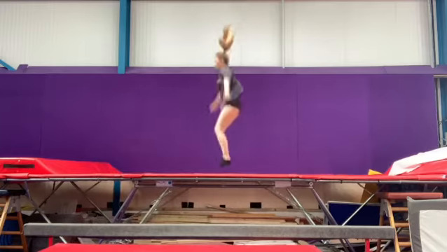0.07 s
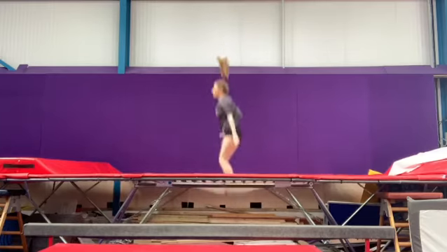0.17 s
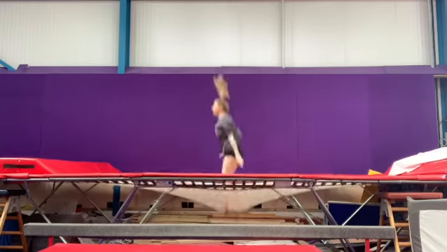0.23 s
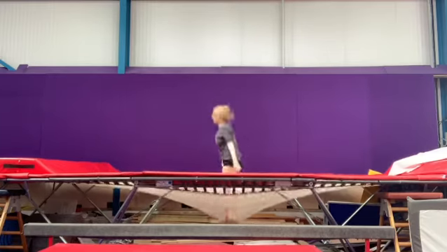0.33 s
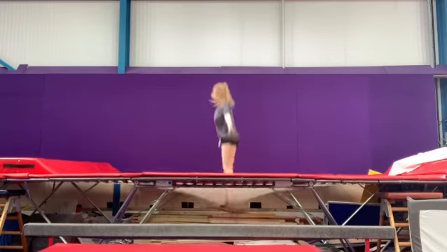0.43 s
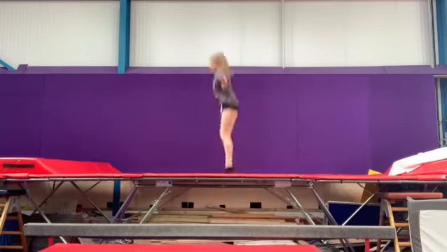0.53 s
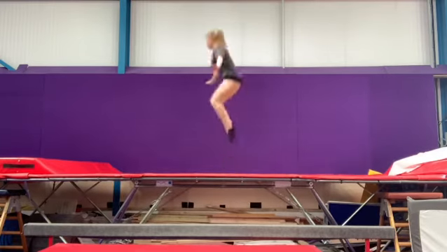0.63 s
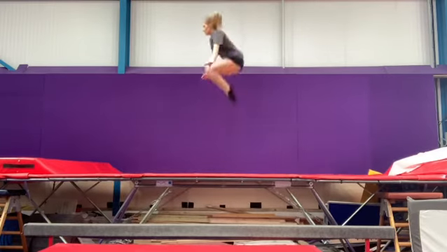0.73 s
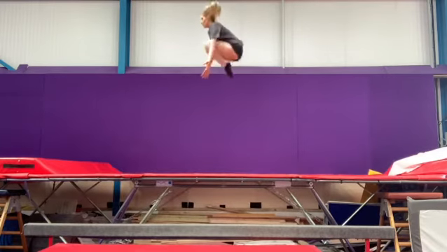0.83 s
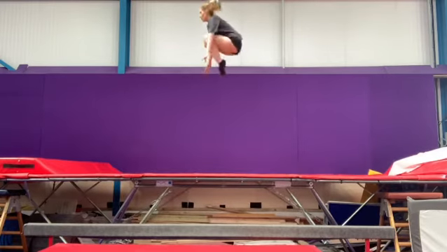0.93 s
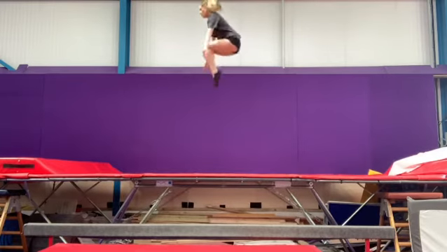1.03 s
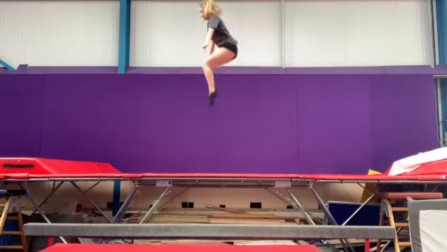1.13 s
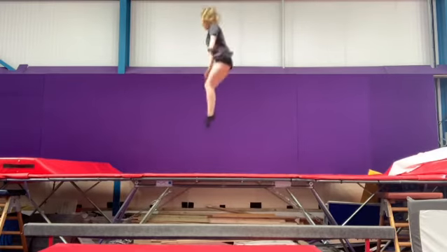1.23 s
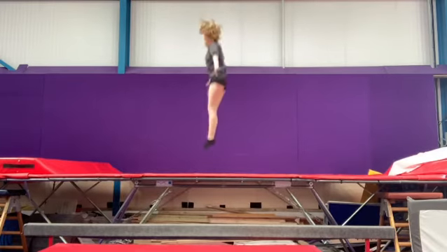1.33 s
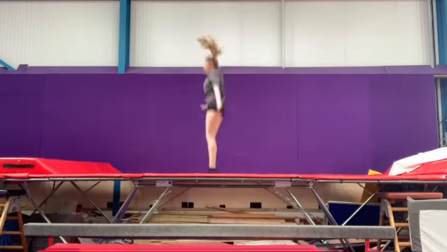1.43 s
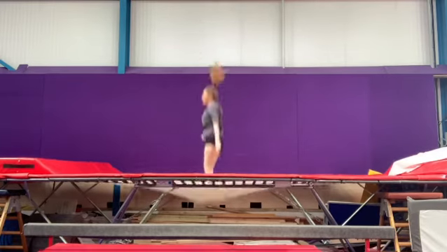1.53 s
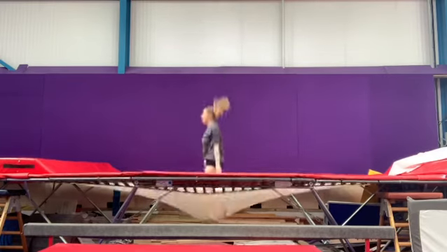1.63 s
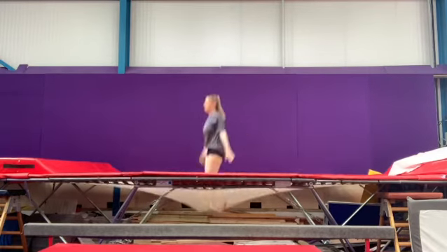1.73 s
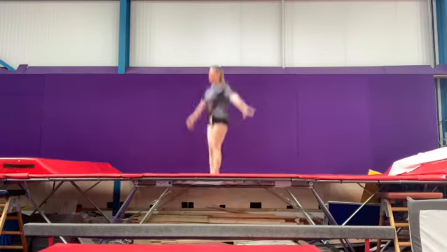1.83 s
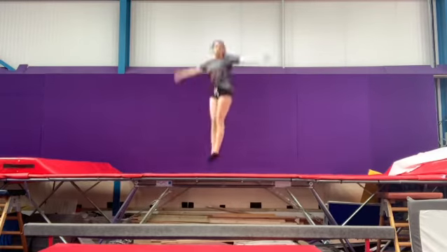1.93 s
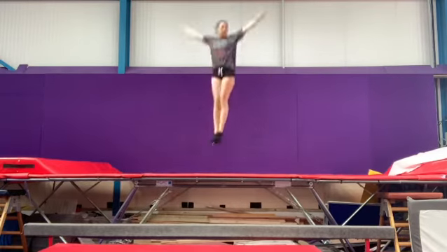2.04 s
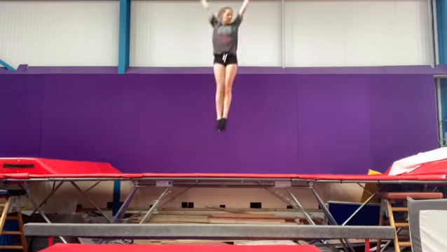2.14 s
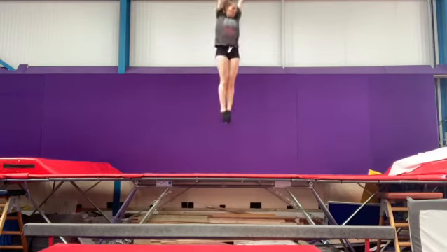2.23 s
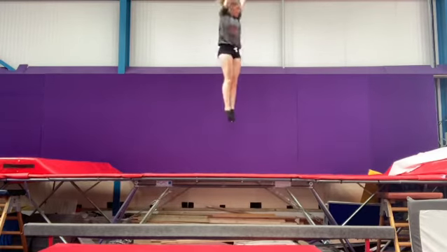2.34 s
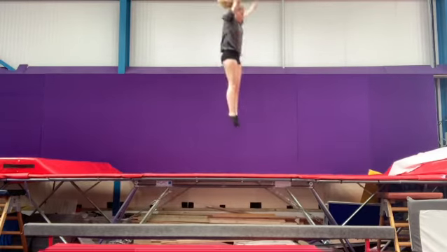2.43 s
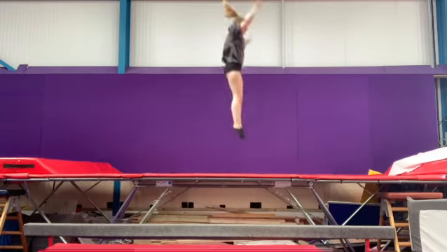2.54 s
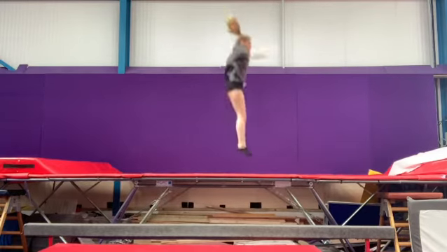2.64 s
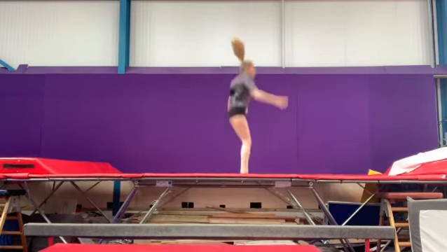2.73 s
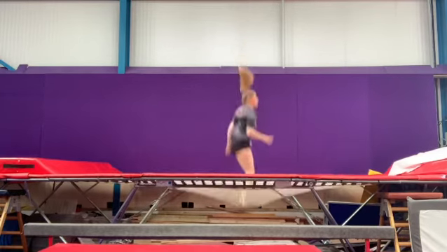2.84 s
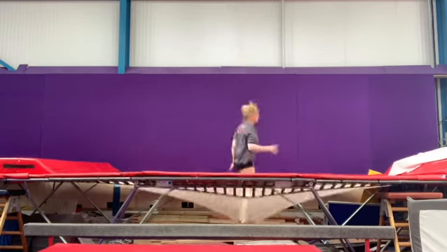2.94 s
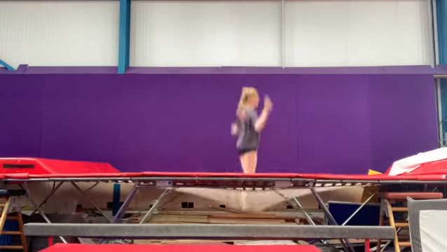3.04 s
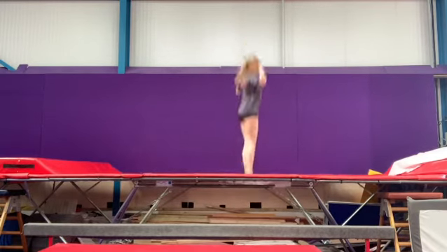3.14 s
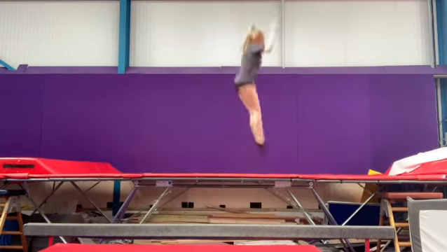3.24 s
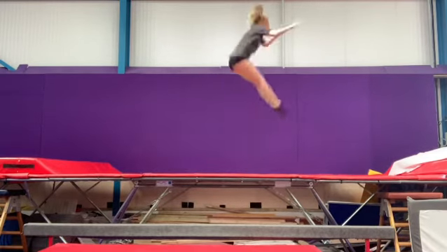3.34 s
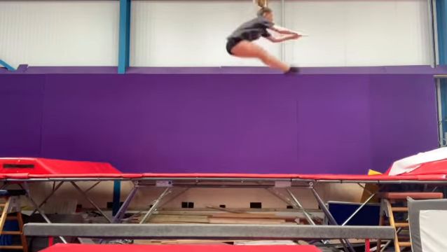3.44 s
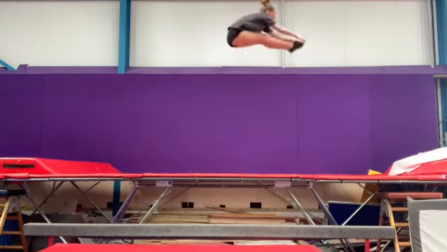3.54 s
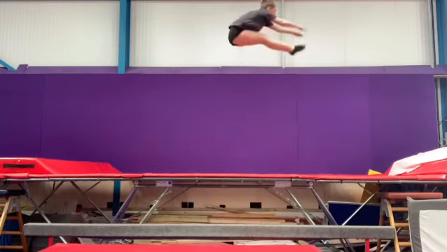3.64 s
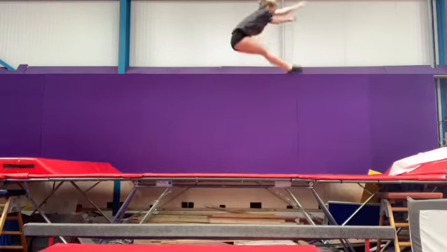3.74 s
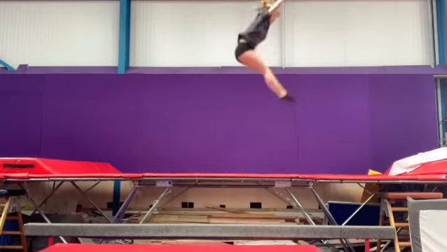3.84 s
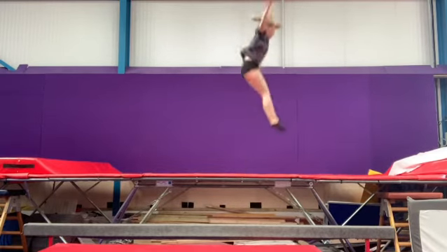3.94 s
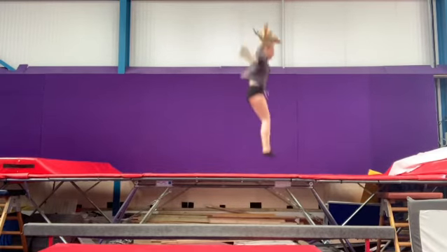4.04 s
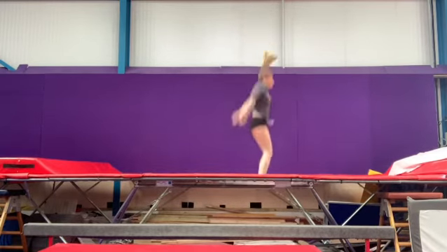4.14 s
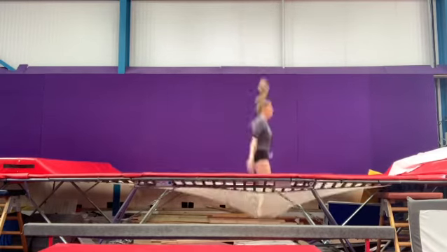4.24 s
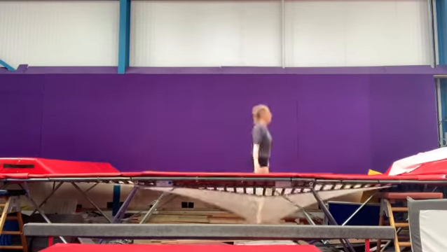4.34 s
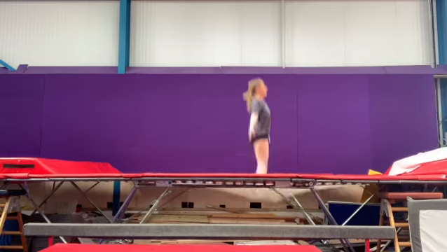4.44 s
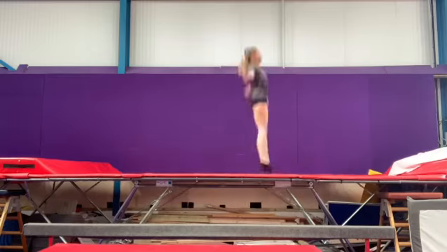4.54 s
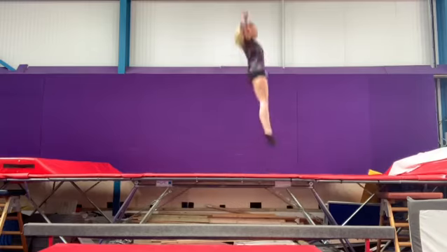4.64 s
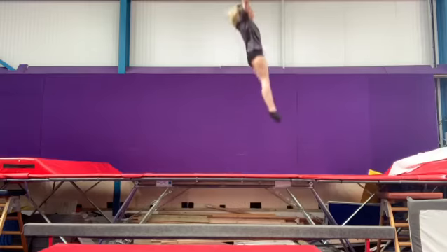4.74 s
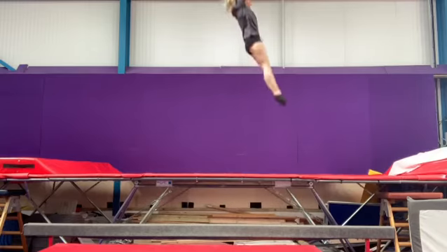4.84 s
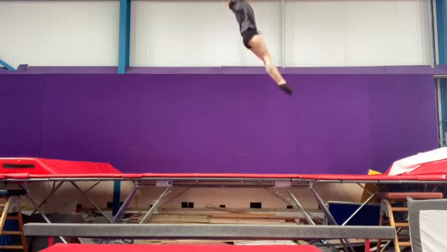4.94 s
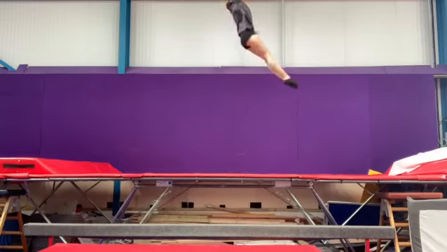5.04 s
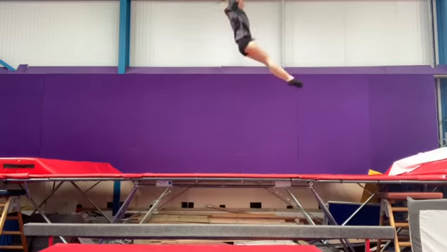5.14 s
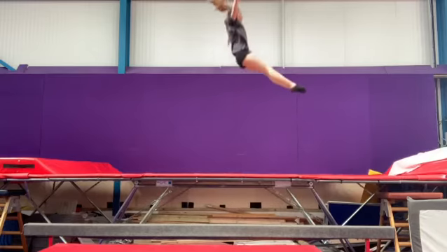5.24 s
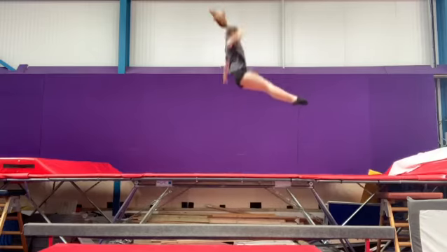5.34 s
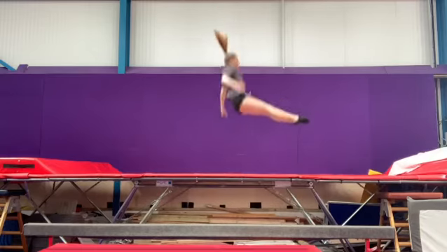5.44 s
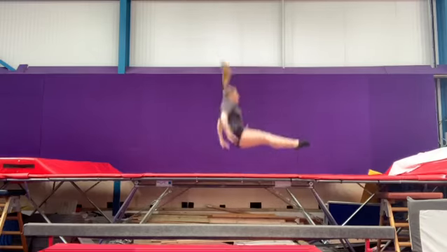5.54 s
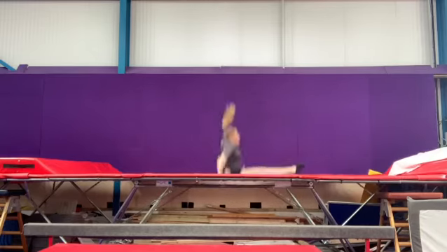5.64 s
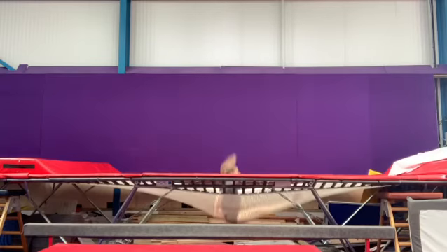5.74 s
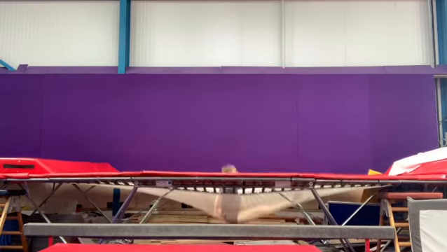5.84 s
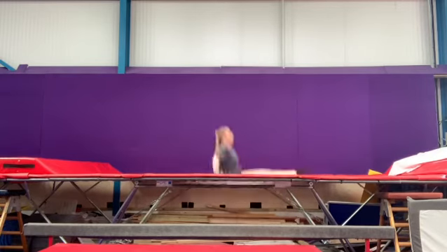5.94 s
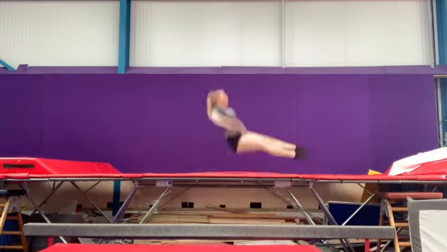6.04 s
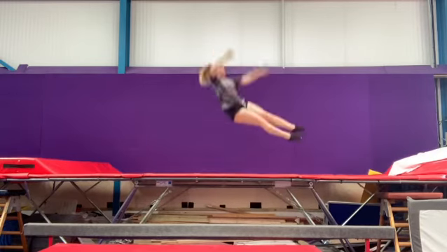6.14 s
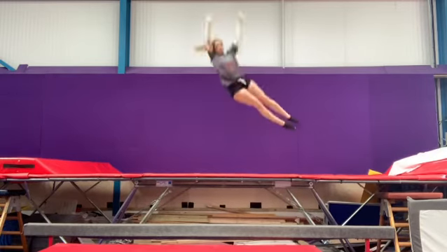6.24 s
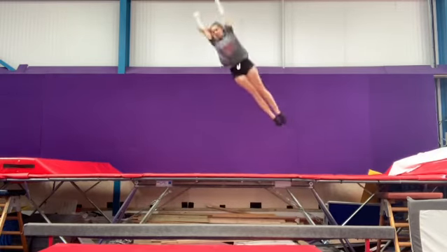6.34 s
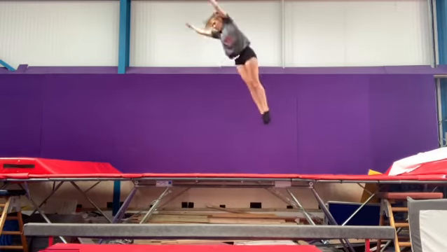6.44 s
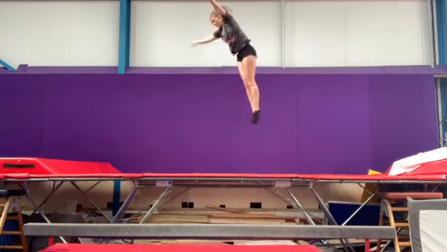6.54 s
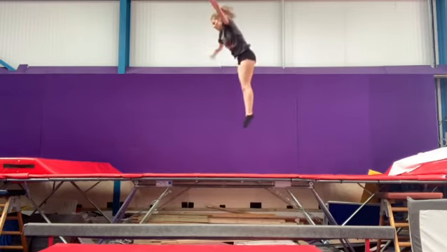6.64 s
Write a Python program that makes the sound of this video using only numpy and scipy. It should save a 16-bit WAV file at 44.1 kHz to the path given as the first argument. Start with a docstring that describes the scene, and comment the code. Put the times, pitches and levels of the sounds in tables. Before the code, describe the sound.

A gymnast bounces on a large trampoline in a resonant sports hall. Each landing starts with a faint pat, swells for half a second into rushing air with creaking, groaning springs and small clicks, then cuts off in a loud rattle and thump that rings briefly. Near-silence separates the bounces. The fifth, a seat landing, creaks harder and bangs twice. Stereo microphone a little way off, faint ventilation beneath.

```python
"""A light pat and a rush of air through webbing: a gymnast lands on a large trampoline in a sports hall.
She bounces five times, the last time landing on her seat. While she sinks in, filtered grains of noise
make the rushing air and the stretching springs, which creak, groan and click on their hooks.
As she leaves, the bed snaps flat: slack springs rattle in bursts of grains through resonances, bed and
pads thump as short low tones, the frame knocks, and bands of decaying noise make the hall ring on."""
import sys
import numpy as np
from scipy import signal
from scipy.fft import rfft, irfft, next_fast_len
from scipy.io import wavfile

SR = 44100
rng = np.random.default_rng(int(sys.argv[2]) if len(sys.argv) > 2 else 0)


def transcribe(signal):
    """Save signal, clipped to [-1, 1], as a 16-bit WAV file at the path in sys.argv[1]."""
    frames = np.atleast_2d(signal).T
    limited = np.clip(frames, -1, 1)
    pcm = np.round(limited * 32767).astype(np.int16)
    wavfile.write(sys.argv[1], SR, pcm)


N = 294568
TIME = np.arange(N) / SR

# Bed under load. Each row: touch-down and lift-off in seconds, then pat, air rush, bed rumble and spring
# creak in dB, swell with depth in dB, groan at the bottom in dB.
LANDINGS = [(0.065, 0.532, -66.5, -52.5, -55, -59.5, 3, -53.5),
            (1.401, 1.906, -67, -51.5, -51, -66, -4.5, -67),
            (2.691, 3.169, -65.5, -52.5, -54, -65, 2.5, -66),
            (4.059, 4.497, -62.5, -51.5, -49, -58, 8, -50),
            (5.562, 6.048, -70, -49.5, -44, -42.5, 6, -39.5)]
# The bed snaps taut, at each lift-off and at the bottom of the seat landing. Each row: time in seconds,
# spring rattle in dB, rattle rise and lag of the pads in seconds, pad slap and flutter in dB,
# settling time in seconds.
BED_SNAPS = [(0.573, -38.5, 0.0041, 0.0079, -36, -32.5, 0.06), (1.906, -38, 0.003, 0.0039, -39, -32, 0.024),
             (3.202, -41, 0.0048, 0.0098, -41, -36, 0.087),
             (4.563, -37.5, 0.0065, 0.026, -36.5, -33, 0.058),
             (5.814, -34.5, 0.02, 0.02, -37.5, -25.5, 0.026), (6.029, -34, 0.0064, 0.017, -36, -23, 0.12)]
# Spectrum of the spring creak. Each row: frequency in Hz, relative density in dB.
CREAK_SPECTRUM = [(300, 0), (900, 22), (2200, -14), (3500, 9), (6000, -2), (8500, 0.5), (10500, -4.5),
                  (12500, -8.5), (15500, -6.5)]
# Spectrum of the spring groan. Each row: frequency in Hz, relative density in dB.
GROAN_SPECTRUM = [(80, -1.5), (200, -8.5), (500, -3.5), (950, 5.5), (1500, -6.5), (2300, -5), (4000, -10),
                  (8000, -41)]
# Spectrum of the pad slap. Each row: frequency in Hz, relative density in dB.
SLAP_SPECTRUM = [(60, -36.5), (200, -3.5), (340, -1.5), (520, -4), (650, -3), (760, 0.5), (940, 0.5),
                 (1200, 0.5), (1600, -6.5), (2300, -10), (5000, -22), (12000, -50.5)]
# Spectrum of the pad flutter and thud. Each row: frequency in Hz, relative density in dB.
PAD_SPECTRUM = [(20, -14.5), (38, -20), (54, -5.5), (95, 4.5), (160, 1.5), (220, -7.5), (300, -4.5),
                (450, -10.5), (900, -17), (3000, -55)]
# Thin ring of the steel coils. Each row: frequency in Hz, width in Hz, relative level in dB.
COIL_MODES = [(1970, 22, 4), (2261, 11, 2.5), (2960, 27, -2), (3150, 21, 2.5), (3480, 35, -1),
              (3700, 31, -3), (3850, 18, -1), (4220, 34, -6)]
# Hall bands. Each row: centre in Hz, reverberation time in seconds, relative tail level in dB,
# likeness of left and right from 0 to 1.
HALL_BANDS = [(58.2, 0.78, 5.5, 0.99), (143, 0.7, 0.5, 0.99), (362, 1.09, 4.5, 0.74), (880, 1, -1.5, 0.55),
              (1510, 1.21, 4, 0.65), (3580, 1.045, 6.5, 0.82), (6430, 0.72, 5, 0.9),
              (8230, 0.083, -15, 0.07), (14900, 0.32, 0, 0.02)]


def undb(db):
    """Decibels to gain."""
    return 10 ** (np.asarray(db) / 20)


def unit(x):
    """Scale to rms 1."""
    return x / np.sqrt(np.mean(x ** 2))


def along(points, hz):
    """Read (Hz, value) points on a log-frequency axis."""
    f, value = np.transpose(points)
    return np.interp(np.log(np.maximum(hz, 1)), np.log(f), value)


def colour(x, points):
    """Minimum-phase filter with the given spectrum; keeps the level of white noise."""
    size = 2 * next_fast_len(len(x))
    gain = unit(undb(along(points, np.fft.rfftfreq(size, 1 / SR))))
    # fold the cepstrum to make the filter causal
    cepstrum = irfft(np.log(gain))
    cepstrum[1:size // 2] *= 2
    cepstrum[size // 2 + 1:] = 0
    response = np.exp(rfft(cepstrum))
    return irfft(rfft(x, size) * response)[:len(x)]


def resonate(x, modes):
    """Damped resonances (Hz, width Hz, dB) side by side; keeps the level of white noise."""
    t = TIME[:SR // 20]
    ring = 0
    for hz, width_hz, db in modes:
        decay = np.exp(-np.pi * width_hz * t)
        ring = ring + undb(db) * width_hz * decay * np.sin(2 * np.pi * hz * t)
    return signal.oaconvolve(x, ring / np.linalg.norm(ring))[:N]


def grains(rate_hz, spread_db):
    """Tiny random impacts of unequal size, rms 1."""
    hits = rng.random(N) < rate_hz / SR
    return unit(hits * rng.standard_normal(N) * undb(spread_db * rng.standard_normal(N)))


def walk(rate_hz):
    """Random wander: straight lines between normal draws, rate_hz of them a second."""
    return np.interp(TIME * rate_hz, np.arange(N), rng.standard_normal(N))


def burst(peak_s, rise_s, decay_s):
    """Exponential envelope that climbs to 1 at the given time and dies away."""
    t = TIME - peak_s
    return np.exp(np.maximum(np.minimum(t / rise_s, -t / decay_s), -60))


def tick(start_s):
    """One hard contact: a single sample with the energy of a millisecond at rms 1."""
    return (np.arange(N) == int(start_s * SR)) * np.sqrt(SR / 1000)


def loaded_bed(give_s=0.013, attack_s=0.013, release_s=0.11, creak_power=2.04, creak_skew=1.9,
               creak_end=0.93, flicker_db=3.5, catch_db=-7):
    """The bed sinks and rises in half a sine; air passes the webbing and springs creak with the stretch."""
    # Spectrum of the air rush. Each row: frequency in Hz, relative density in dB.
    rush_spectrum = [(100, -1), (250, -2.5), (450, -3), (720, -1), (920, 2.5), (1200, 0), (1550, -9),
                     (2300, -8.5), (4000, -20), (7000, -31.5), (15000, -52.5)]
    # Spectrum of the bed rumble. Each row: frequency in Hz, relative density in dB.
    rumble_spectrum = [(20, -38), (35, -6.5), (50, 5), (100, 4), (160, -4.5), (260, -6), (600, -54)]
    # Small creaks of straps and hooks. Each row: frequency in Hz, width in Hz, level over air rush in dB.
    strap_modes = [(620, 110, -31), (897, 310, -15), (1160, 83, -24), (2060, 150, -15.5), (2860, 580, -14),
                   (3740, 370, -16.5)]
    strap_creaks_hz = 22

    rush, rumble, creak, strain = np.zeros((4, N))
    for down_s, up_s, _, rush_db, rumble_db, creak_db, swell_db, _ in LANDINGS:
        phase = np.clip((TIME - down_s) / (up_s - down_s), 0, 1)
        depth = np.abs(np.sin(np.pi * phase))
        onset = 1 - np.exp(-(np.maximum(TIME - down_s - give_s, 0) / attack_s) ** 2)
        release = np.clip((up_s - TIME) / release_s, 0, 1)
        load = onset * release * undb(swell_db * (depth - .5))
        rush += undb(rush_db) * load
        rumble += undb(rumble_db) * load
        strain += undb(rush_db) * load * depth
        # the coils bind, so their creak lags the stretch
        creak_phase = np.minimum(phase / creak_end, 1) ** creak_skew
        creak += undb(creak_db) * np.abs(np.sin(np.pi * creak_phase)) ** creak_power

    # stick and slip: some tens of times a second a hook catches in a cluster of ticks
    catches = unit(np.maximum(walk(110), 0) ** 3 * grains(2700, 0.75))
    straps = 0
    for mode in strap_modes:
        straps = straps + undb(mode[2]) * resonate(strain * grains(strap_creaks_hz, 0), [mode])
    air = colour(rush * grains(6000, 0.35) * undb(flicker_db * walk(40)), rush_spectrum)
    bed = colour(rumble * rng.standard_normal(N), rumble_spectrum)
    springs = colour(creak * grains(4800, 0.96) * undb(flicker_db * walk(70)), CREAK_SPECTRUM)
    hooks = undb(catch_db) * colour(rush * catches, GROAN_SPECTRUM)
    return straps + air + bed + springs + hooks


def surges(bottom_s=0.26, groan_rise_s=0.047, groan_decay_s=0.22, thud_db=-1, judder_db=1.5, coil_db=-13):
    """In every landing the springs slip in juddering creaks and groan at the bottom, shaking the pads."""
    # Springs slipping under load. Each row: time in seconds, creak and groan in dB, rise and decay in seconds.
    spring_slips = [(0.222, -54, -66, 0.012, 0.024), (0.379, -55.5, -58, 0.008, 0.017),
                    (0.445, -47.5, -53, 0.016, 0.034), (1.595, -56, -66.5, 0.039, 0.068),
                    (1.785, -56, -62, 0.01, 0.034), (2.872, -59.5, -54, 0.015, 0.051),
                    (3.02, -50.5, -48, 0.0093, 0.016), (3.06, -55.5, -53, 0.02, 0.042),
                    (4.224, -51.5, -47, 0.014, 0.031), (4.3, -56, -61, 0.0082, 0.024),
                    (4.41, -51, -71, 0.018, 0.045), (5.704, -53.5, -62, 0.011, 0.035)]

    judder = unit(undb(judder_db * walk(90)))
    creak_level = sum(undb(db) * burst(s, rise, decay) for s, db, _, rise, decay in spring_slips)
    slip_level = sum(undb(db) * burst(s, rise, decay) for s, _, db, rise, decay in spring_slips)
    groan_level = sum(undb(db) * burst(down_s + bottom_s, groan_rise_s, groan_decay_s)
                      for down_s, *_, db in LANDINGS)
    creaks = judder * creak_level * grains(5000, 1.3)
    groans = (judder * groan_level + judder * slip_level) * grains(2000, 1.9)
    thuds = groan_level * grains(3000, 0.8)
    return (colour(creaks, CREAK_SPECTRUM) + undb(coil_db) * resonate(creaks, COIL_MODES)
            + colour(groans, GROAN_SPECTRUM) + undb(thud_db) * colour(thuds, PAD_SPECTRUM))


def rattles(decay_s=0.018, brush_db=-1, pad_rise_s=0.004, slap_rise_s=0.0089, jangle_db=-15,
            jangle_decay_s=0.028, coil_db=-12, pad_coil_db=-20):
    """Slack springs jangle and ring briefly; the pads that cover them slap down and shake them again."""
    # Spectrum of the spring rattle. Each row: frequency in Hz, relative density in dB.
    rattle_spectrum = [(300, 19), (1100, 21.5), (1600, 3), (2400, 17), (3500, 1), (5000, 2.5), (7000, 1),
                       (10000, -2.5), (13000, 1), (15500, -4.5)]

    jangle, slap, shaken = np.zeros((3, N))
    for snap_s, rattle_db, rise_s, lag_s, slap_db, _, settle_s in BED_SNAPS:
        pads_down_s = snap_s + lag_s + pad_rise_s  # the pads take a moment to come down
        jangle += undb(rattle_db) * burst(snap_s, rise_s, decay_s)
        slap += undb(slap_db) * burst(pads_down_s, slap_rise_s, settle_s)
        shaken += undb(slap_db) * burst(pads_down_s, slap_rise_s, jangle_decay_s)
    metal = (jangle + undb(jangle_db) * shaken) * grains(5000, 0.96)
    pads = (slap + undb(brush_db) * jangle) * grains(3000, 2.35)
    coils = resonate(undb(coil_db) * metal + undb(pad_coil_db) * pads, COIL_MODES)
    return colour(metal, rattle_spectrum) + colour(pads, SLAP_SPECTRUM) + coils


def thumps(rise_s=0.0013, decay_s=0.11, flutter_after_s=0.018):
    """Each flap of the bed pushes a few low cycles of air; the loose pads flutter after every snap."""
    # Flaps of bed and pads. Each row: start in seconds, level in dB, pitch in Hz, swell in seconds.
    flaps = [(0.325, -37.5, 148, 0.0098), (0.581, -19, 137, 0.004), (0.59, -27.5, 73, 0.01),
             (0.599, -21.5, 134, 0.0045), (0.603, -19, 226, 0.0052), (0.648, -37, 228, 0.005),
             (1.752, -44.5, 171, 0.0078), (1.917, -22, 134, 0.0042), (1.92, -23, 305, 0.0048),
             (1.936, -18.5, 72, 0.0066), (1.94, -33, 410, 0.013), (1.952, -25.5, 250, 0.0048),
             (1.98, -24.5, 210, 0.0056), (3.21, -20.5, 158, 0.0026), (3.216, -36.5, 65.6, 0.018),
             (3.235, -21.5, 206.3, 0.007), (3.241, -25.5, 106, 0.015), (4.575, -31, 306, 0.0059),
             (4.597, -31, 146, 0.0071), (5.831, -17, 168, 0.0049), (5.87, -18.5, 163, 0.0064),
             (5.878, -26, 82, 0.015), (5.884, -25, 233, 0.006), (6.034, -13.5, 206.5, 0.0039),
             (6.055, -28, 69, 0.02), (6.057, -15.5, 216.5, 0.0052), (6.096, -21.5, 212, 0.0048)]

    boom = 0
    for start_s, db, hz, swell_s in flaps:
        t = np.maximum(TIME - start_s, 0)
        swell = t / swell_s * np.exp(1 - t / swell_s)
        boom = boom + undb(db) * swell * np.sin(2 * np.pi * hz * t)
    flutter = sum(undb(db) * burst(s + lag_s + flutter_after_s, rise_s, decay_s)
                  for s, _, _, lag_s, _, db, _ in BED_SNAPS)
    return boom + colour(flutter * grains(3300, 1.0), PAD_SPECTRUM)


def knocks(rise_s=0.0019, strike_db=-6, chatter_db=-5.0, focus_db=9, padding_hz=2200):
    """A padded spring strikes the frame and chatters; each spot favours the modes near its own pitch."""
    # Blows on the frame. Each row: time in seconds, level in dB, favoured pitch in Hz,
    # chatter decay in seconds.
    blows = [(0.315, -50, 1200, 0.018), (0.595, -30, 1150, 0.003), (0.611, -30, 1100, 0.023),
             (1.75, -47, 950, 0.0044), (1.919, -28, 850, 0.0087), (1.937, -32.5, 1000, 0.0072),
             (1.952, -32.5, 435, 0.004), (1.987, -40.5, 480, 0.0099), (2.014, -36.5, 447, 0.014),
             (3.022, -50, 900, 0.012), (3.066, -49, 900, 0.012), (3.204, -33.5, 1400, 0.014),
             (3.222, -29.5, 705, 0.0053), (3.241, -32.5, 800, 0.0051), (4.566, -31.5, 800, 0.017),
             (4.601, -32, 850, 0.017), (5.618, -49, 1100, 0.0064), (5.683, -45, 900, 0.017),
             (5.759, -41, 950, 0.016), (5.827, -19, 720, 0.0072), (5.846, -24, 620, 0.023),
             (5.883, -30, 950, 0.016), (5.931, -36, 880, 0.008), (6.031, -32, 800, 0.007),
             (6.062, -27, 420, 0.0094), (6.077, -29.5, 750, 0.012)]
    # Ring of frame and pad boards. Each row: frequency in Hz, width in Hz, relative level in dB.
    frame_modes = [(343, 27, -6.5), (480, 18.5, 8), (670, 110, 0.5), (879, 143, 5), (1000, 100, 3),
                   (1159, 25, -6), (2100, 670, -31)]

    chatter, out = undb(chatter_db) * grains(5000, 0.79), 0
    for start_s, db, spot_hz, decay_s in blows:
        size = 1 + .02 * rng.uniform(-1, 1)
        modes = [(hz * size, width_hz, mode_db - focus_db * np.log2(hz / spot_hz) ** 2)
                 for hz, width_hz, mode_db in frame_modes]
        hit = undb(strike_db) * tick(start_s) + burst(start_s, rise_s, decay_s) * chatter
        ring = resonate(hit, modes)
        out = out + undb(db) * ring / np.linalg.norm(ring)
    out = out * np.sqrt(SR / 100)  # unit energy becomes that of 10 ms at rms 1
    return signal.sosfilt(signal.butter(2, padding_hz, fs=SR, output="sos"), out)


def clicks(rise_s=0.0025, catches_db=-3):
    """A hook lets go with a tick amid a run of catches and rings its spring; springs differ in pitch. Two pats
    on the bed tick through the springs the same way."""
    # Hooks slipping, and the ticks of two pats at touch-down (a bright one at 4.069 s, a dark one at 5.581 s).
    # Each row: time in seconds, level in dB, brightness in dB per octave, decay in seconds.
    spring_ticks = [(0.25, -47.5, -18, 0.0051), (0.408, -49, -20, 0.0045), (0.428, -43, -21, 0.0082),
                    (0.576, -46, -1, 0.0026), (0.595, -35.5, -29, 0.0028), (1.717, -44.5, -7, 0.0081),
                    (1.755, -48, -15, 0.0022), (1.772, -40, -8, 0.0071), (1.912, -31, -43, 0.0029),
                    (2.985, -45, -13, 0.0065), (3.054, -44.5, -9, 0.005), (3.204, -36, -36, 0.0055),
                    (3.247, -46, -19, 0.012), (4.069, -67, -1, 0.0016), (4.294, -52, -20, 0.003),
                    (4.349, -53, -7, 0.003), (4.402, -40, -10, 0.014), (4.587, -44, -24, 0.0028),
                    (5.581, -43, -50, 0.0026), (5.694, -62, -4, 0.003), (5.885, -25.5, -4.5, 0.0035)]
    # Ring of a spring and its hook. Each row: frequency in Hz, width in Hz, relative level in dB.
    spring_modes = [(2235, 270, -6), (3280, 220, 9), (3890, 1100, 5), (5430, 520, -4), (6100, 510, 3.5),
                    (8340, 120, 28), (9450, 820, -9), (13500, 3700, -42.5)]

    catches, out = undb(catches_db) * grains(7000, 0.81), 0
    lowest_hz = spring_modes[0][0]
    for start_s, db, tilt_db, decay_s in spring_ticks:
        size = 1 + .03 * rng.uniform(-1, 1)
        modes = [(hz * size, width_hz, mode_db + tilt_db * np.log2(hz / lowest_hz))
                 for hz, width_hz, mode_db in spring_modes]
        slip = tick(start_s) + burst(start_s, rise_s, decay_s) * catches
        out = out + undb(db) * resonate(slip, modes)
    return out


def touches(rise_s=0.00072, decay_s=0.011, after_s=0.0055):
    """A light pat, a short noise burst, as the gymnast meets the bed."""
    # Spectrum of the pat. Each row: frequency in Hz, relative density in dB.
    pat_spectrum = [(300, -4), (1500, 4.5), (3000, 0.5), (5000, -4), (8000, -18.5), (15000, -17.5)]
    pats = sum(undb(db) * burst(down_s + after_s, rise_s, decay_s) for down_s, _, db, *_ in LANDINGS)
    return colour(pats * rng.standard_normal(N), pat_spectrum)


def hall_bands():
    """Yield, per band, stereo noise of diffuse echoes and its reverberation time; the bass is most alike."""
    hz = np.fft.rfftfreq(N, 1 / SR)
    mid, side = rfft(rng.standard_normal((2, N)))
    for k, (_, t60_s, db, alike) in enumerate(HALL_BANDS):
        band = along([(row[0], j == k) for j, row in enumerate(HALL_BANDS)], hz)
        alike = np.clip(alike, 0, 1)
        shared = np.sqrt((1 + alike) / 2) * mid
        opposed = np.sqrt((1 - alike) / 2) * side * np.array([[1], [-1]])
        yield undb(db) * irfft(band * (shared + opposed), N), t60_s


def hall(x, gap_s=0.00092, build_s=0.013, early_db=3, early_decay_s=0.01, uneven_db=2, count=7):
    """Echoes thicken into an unevenly dying tail; sound darts about the frame, each part with own echoes."""
    t = TIME[:4 * SR // 3]
    onset = 1 - np.exp(-np.maximum(t - gap_s, 0) / build_s)
    onset = onset * (1 + undb(early_db) * np.exp(-t / early_decay_s))
    noises, t60s = zip(*hall_bands())
    fades = onset * np.exp(-np.log(1000) * t / np.array(t60s)[:, None])
    fades *= undb(uneven_db * np.array([walk(30.6)[:len(t)] for _ in HALL_BANDS]))
    fades /= np.linalg.norm(fades, axis=1, keepdims=True)
    # wandering shares of the sound, their powers adding to 1
    shares = np.array([walk(70) for _ in range(count)])
    shares /= np.linalg.norm(shares, axis=0)
    places = np.linspace(0, N - len(t), count).astype(int)
    out = 0
    for share, place in zip(shares, places):
        response = sum(noise[:, place:place + len(t)] * fade for noise, fade in zip(noises, fades))
        out = out + signal.fftconvolve((x * share)[None], response, axes=1)[:, :N]
    return out


def room_air(air_db=-73, apart_db=-8, echo_db=-68, boom_db=-66, echo_decay_s=0.12):
    """Faint steady ventilation noise, and the last of an earlier bounce dying in the hall."""
    # Spectrum of the ventilation. Each row: frequency in Hz, relative density in dB.
    air_spectrum = [(20, -15.5), (60, 6.5), (110, -15), (170, -12.5), (290, -7.5), (500, -9), (1000, -15.5),
                    (2500, -22.5), (5000, -31.5), (13000, -43.5), (15500, -45)]
    shared, left, right = (colour(rng.standard_normal(N), air_spectrum) for _ in range(3))
    air = undb(air_db) * (shared + undb(apart_db) * np.array([left, right]))
    echo = undb(echo_db) * np.array([colour(rng.standard_normal(N), SLAP_SPECTRUM) for _ in range(2)])
    boom = undb(boom_db) * colour(rng.standard_normal(N), PAD_SPECTRUM)
    return air + (echo + boom) * np.exp(-TIME / echo_decay_s)


def scene(direct_db=0.0, hall_db=-3, click_echo_db=-5, thump_echo_db=-2):
    """The trampoline ahead, in the hall; clicks and thumps from its near edge carry less echo."""
    # Phase of right behind left for direct sound. Each row: frequency in Hz, lag in radians.
    stereo_lag = [(100, 0.02), (1000, 0.2), (2150, 0.2), (4300, 0.67), (7000, 0), (9000, 3), (11000, 7.5),
                  (13000, 3.5), (16000, 8)]
    body = loaded_bed() + surges() + rattles() + knocks() + touches()
    hooks, flaps = clicks(), thumps()
    trampoline = body + hooks + flaps
    lag_rad = along(stereo_lag, np.fft.rfftfreq(N, 1 / SR))
    direct = np.array([trampoline, irfft(rfft(trampoline) * np.exp(-1j * lag_rad), N)])
    echoes = hall(body + undb(click_echo_db) * hooks + undb(thump_echo_db) * flaps)
    return undb(direct_db) * direct + undb(hall_db) * echoes + room_air()


def record(dry, low_hz=36, top_hz=15800):
    """Shape the stereo sum and difference, tilt the balance by frequency, cut deep bass and top."""
    # Stereo shape: the sum dips near 9 kHz, the difference fades above 13 kHz.
    # Each row: frequency in Hz, sum in dB, difference in dB.
    stereo_shape = [(96, 1, 5), (3850, -5.5, 3.5), (6830, 0, 13), (7430, -0.5, 19.5), (8280, -7.5, 2),
                    (8820, -20.5, 10), (10490, 4.5, 22.5), (11100, 4, 13.5), (13100, 8, -22),
                    (16600, 1.5, -21)]
    # Stereo balance. Each row: frequency in Hz, left minus right in dB.
    balance = [(100, 1.6), (350, 1), (1200, 0.7), (2600, -1.3), (5000, 0.9), (12000, 0)]
    hz = np.fft.rfftfreq(N, 1 / SR)
    sum_gain = undb(along([(f, db) for f, db, _ in stereo_shape], hz))
    difference_gain = undb(along([(f, db) for f, _, db in stereo_shape], hz))
    mid = irfft(rfft(dry[0] + dry[1]) / 2 * sum_gain, N)
    side = irfft(rfft(dry[0] - dry[1]) / 2 * difference_gain, N)
    balance_gain = undb(np.outer([1, -1], along(balance, hz)) / 2)
    pair = irfft(rfft([mid + side, mid - side]) * balance_gain, N)
    pair = signal.sosfilt(signal.butter(2, low_hz, "high", fs=SR, output="sos"), pair)
    return signal.sosfilt(signal.ellip(10, .2, 80, top_hz, fs=SR, output="sos"), pair)


dry = scene()
out = record(dry)
transcribe(out)
```